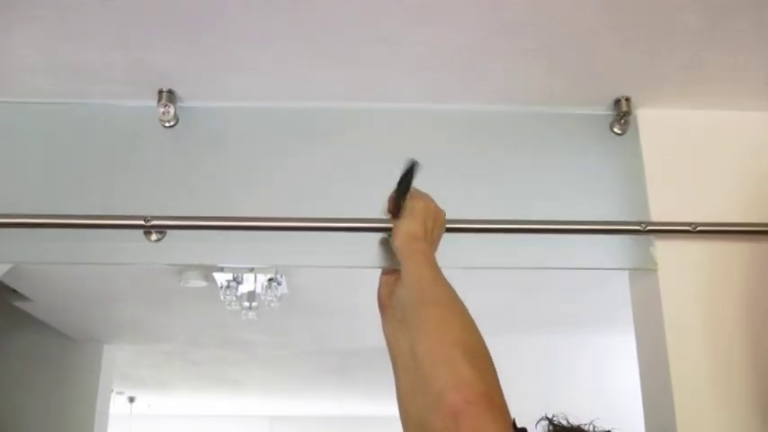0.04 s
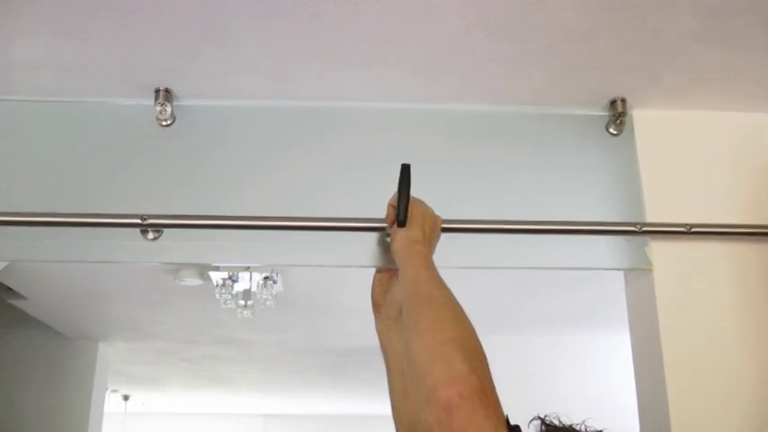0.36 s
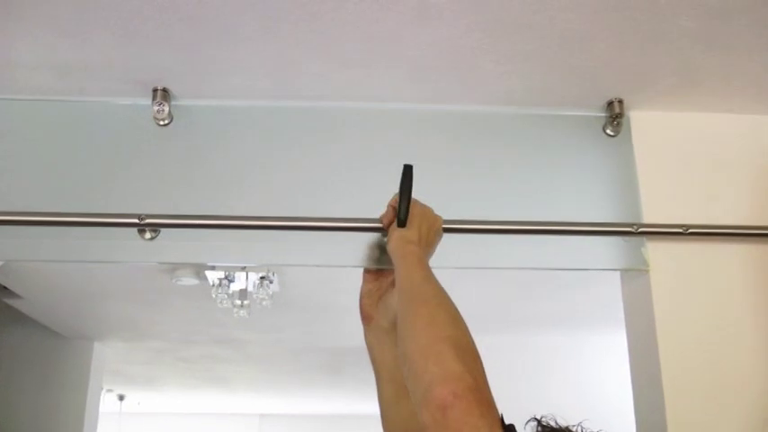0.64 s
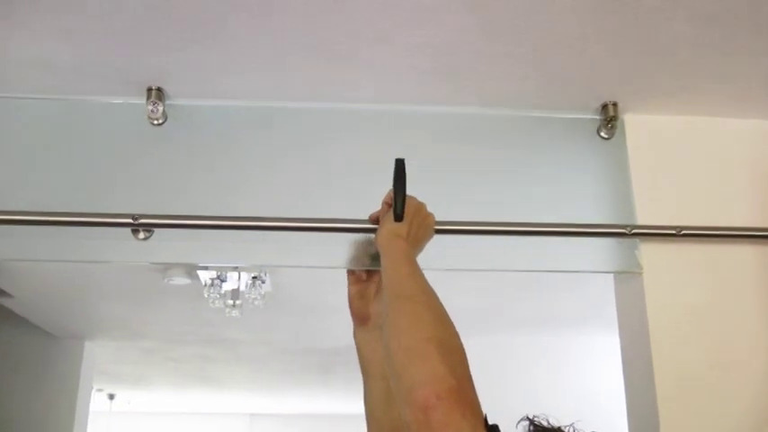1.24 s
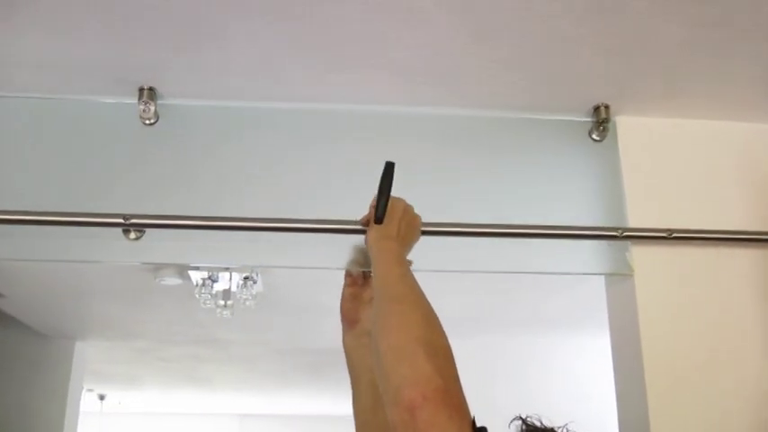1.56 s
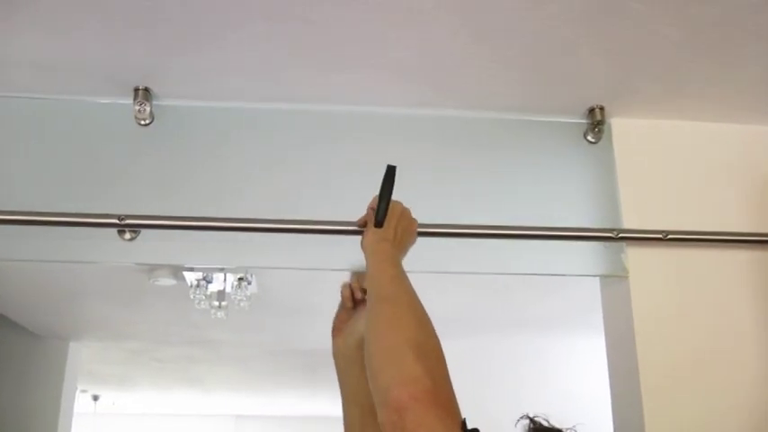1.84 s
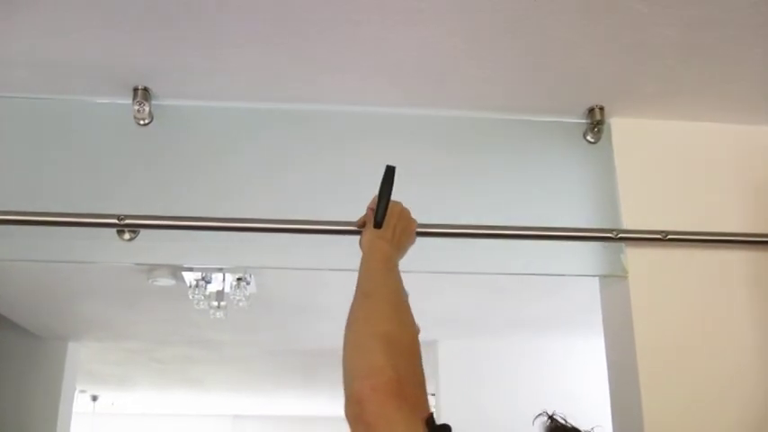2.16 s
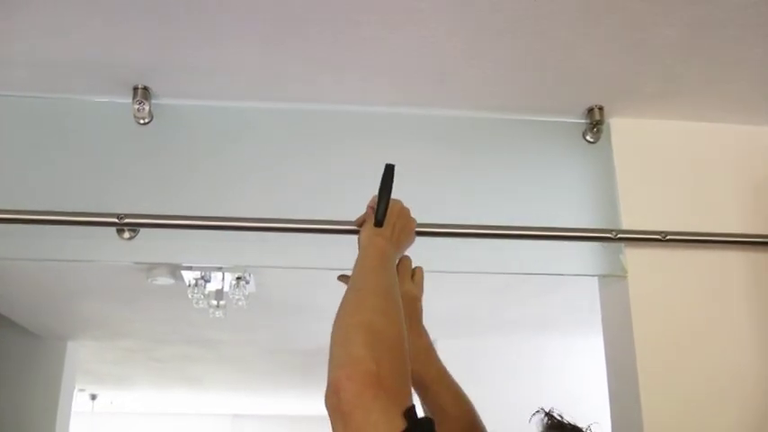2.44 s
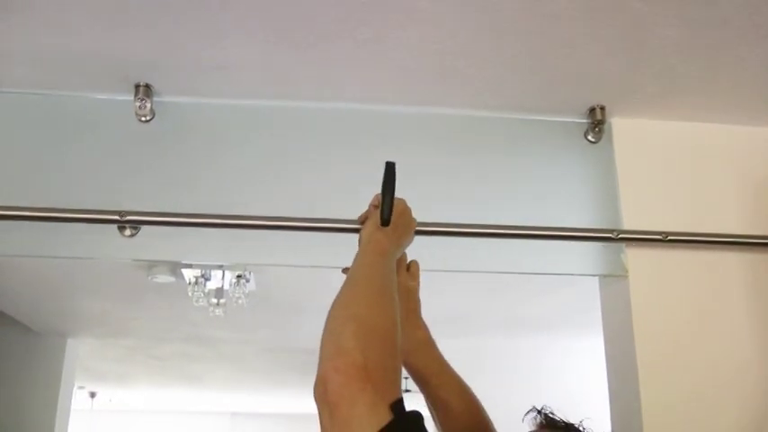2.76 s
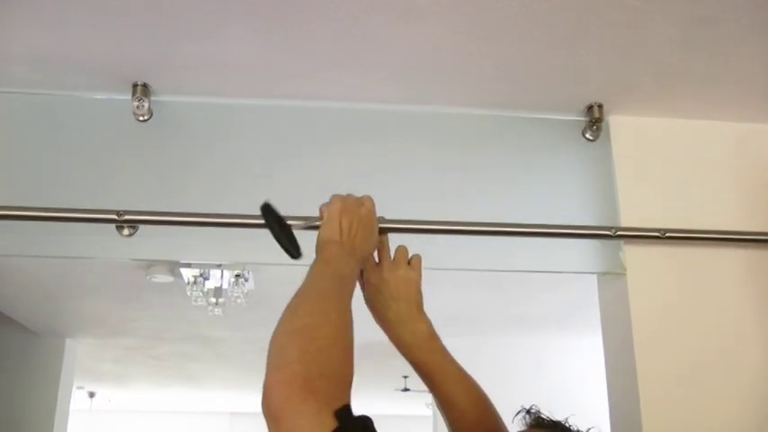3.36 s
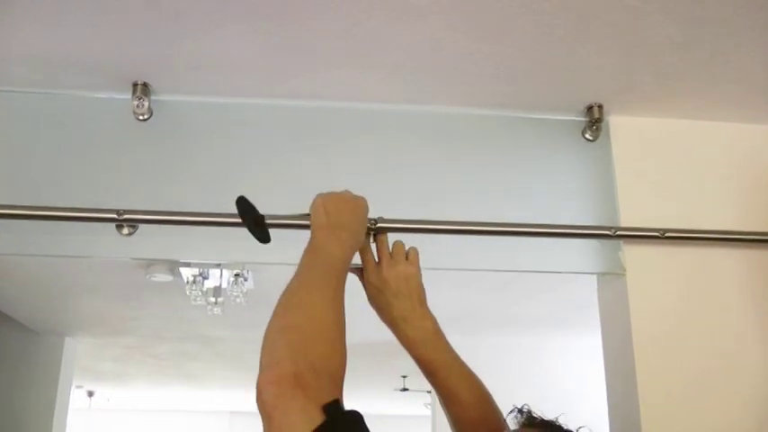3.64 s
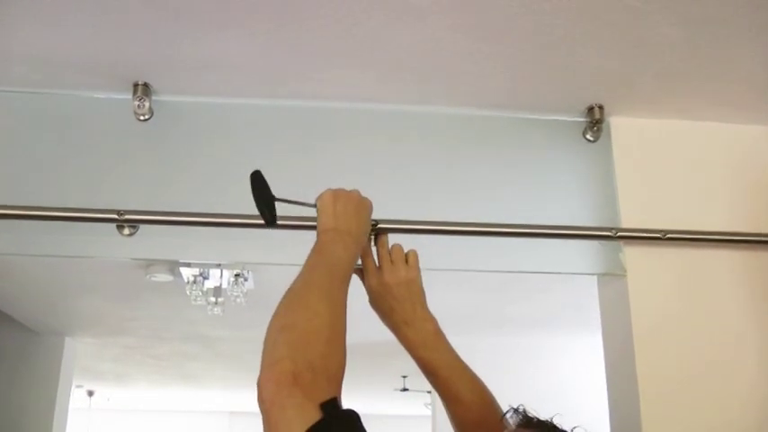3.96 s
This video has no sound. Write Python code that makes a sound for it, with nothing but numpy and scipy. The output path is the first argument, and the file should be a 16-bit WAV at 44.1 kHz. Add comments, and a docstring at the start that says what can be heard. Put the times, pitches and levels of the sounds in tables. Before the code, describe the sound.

A hand tool screws a metal fitting tight, with short grating turns and small clicks.

```python
"""Screwing a fitting onto a glass door.

A T-handled key drives a steel fitting onto the door's rail in a bare, quietly humming room.
The thread sticks and slips in two short, grating turns that ring the fitting and the rail.
The key clicks in its socket and sets a small cap ringing. The glass thuds softly; hands rub on metal."""
import sys
import numpy as np
from scipy import signal
from scipy.fft import rfft, irfft
from scipy.io import wavfile
from scipy.ndimage import uniform_filter1d

SR = 44100
rng = np.random.default_rng(int(sys.argv[2]) if len(sys.argv) > 2 else 0)


def store_wav(level_fs):
    """Save 16-bit WAV to argv[1]."""
    pcm = np.round(np.clip(np.atleast_2d(level_fs), -1, 1) * 32767)
    wavfile.write(sys.argv[1], SR, pcm.T.astype(np.int16))


N = 176400
TIME_S = np.arange(N) / SR

# room noise: freq_hz, relative_db
AIR_SPECTRUM = [(20, -20), (53, -11), (86, -14), (120, -6), (300, -12.5), (380, -13.5), (520, -14.5),
                (800, -20), (1100, -21), (1300, -24), (1700, -14.5), (3000, -19.5), (4110, -18),
                (8000, -27), (11500, -30), (13000, -75.5)]
# faint drones in the room noise: freq_hz, width_hz, gain_db
AIR_MODES = [(289.4, 107.3, -0.5), (777.5, 38.4, 14), (994.1, 8.3, 15.5)]
# low drone: time_s, level_db
RUMBLE_ENVELOPE = [(0, -64), (0.7, -76.5), (1.1, -66), (1.6, -66), (2.6, -68.5), (3.1, -74), (4, -69)]
# reverberation time: freq_hz, t60_s
ROOM_T60 = [(200, 0.85), (400, 0.58), (1000, 0.56), (2200, 0.63), (4500, 0.3553), (8000, 0.3946),
            (13000, 0.01)]
# reverberation level: freq_hz, level_db
ROOM_LEVEL = [(200, -1), (1000, -1.5), (2200, 0.5), (4500, -1.5), (8000, -10.5), (13000, 2.5)]

# hands on metal: time_s, level_db
RUB_ENVELOPE = [(0, -65), (0.6, -60.5), (0.78, -57), (1.2, -57), (1.45, -58.5), (1.9, -64.5), (2.7, -77),
                (3.3, -55.5), (3.85, -57), (4, -52.5)]
# knocks on the glass: start_s, level_db, pitch_hz, decay_s, note_gain_db
THUDS = [(0.0, -45.5, 548, 0.00817, 7), (0.124, -55, 336, 0.0284, 9), (0.232, -49, 331.8, 0.0304, 6.5),
         (1.215, -47.5, 329.8, 0.0199, 6), (1.284, -43.5, 289.8, 0.02, -7),
         (1.535, -48.5, 335.8, 0.051, -4.5), (2.766, -45.5, 207, 0.00634, 4.5),
         (3.372, -46, 324.8, 0.0221, 4.5), (3.607, -55.5, 284.6, 0.0211, 7.5),
         (3.923, -43.5, 312.3, 0.0258, -5)]
# turns of the thread: time_s, level_db
FIRST_TURN_ENVELOPE = [(0, -49.5), (0.045, -55), (0.08, -64), (0.135, -58.5), (0.168, -41.5), (0.21, -40),
                       (0.25, -42), (0.275, -51.5), (0.33, -57), (0.38, -52.5), (0.42, -89)]
LAST_TURN_ENVELOPE = [(2.78, -62), (2.812, -53), (2.832, -45), (2.87, -42.5), (2.92, -45), (2.965, -36.5),
                      (2.985, -30), (3.012, -35.5), (3.035, -42.5), (3.055, -39), (3.09, -48.5),
                      (3.135, -43), (3.17, -67.5)]
# key in its socket: start_s, level_db, decay_s, upper_edge_hz, lower_edge_hz, cap_drive_db
CLICKS = [(0.346, -41.5, 0.0039, 8100, 700, 11), (0.484, -48, 0.00585, 8500, 1500, 2),
          (0.907, -36, 0.0135, 6050, 986, 1), (0.919, -39.5, 0.0096, 5500, 980, 10.5),
          (1.082, -32, 0.0106, 6330, 2280, -30.5), (1.236, -45.5, 0.04, 3470, 1210, -7.5),
          (1.255, -35.5, 0.0096, 9720, 1490, -21), (1.281, -32, 0.00632, 3900, 249, -3),
          (1.481, -43, 0.0053, 6940, 1200, -17.5), (1.4891, -29, 0.00395, 7440, 1340, -0.5),
          (1.526, -25.5, 0.00362, 11400, 1960, -35), (1.529, -24.5, 0.006, 3056, 1126, -29),
          (1.9162, -37, 0.00227, 4940, 3800, -25.5), (1.925, -46, 0.0043, 2170, 298, -20),
          (2.2395, -37.5, 0.00151, 4170, 2740, -25), (2.457, -50.5, 0.026, 3500, 1200, -4.5),
          (2.643, -51.5, 0.0354, 3010, 1200, -4), (2.765, -26, 0.00107, 4030, 3860, -16.5),
          (2.828, -32.5, 0.0063, 3500, 1300, -12), (2.838, -31.5, 0.0047, 6300, 785, -19.5),
          (2.859, -46, 0.0043, 8000, 890, -21), (2.889, -26.5, 0.0027, 9400, 1480, -24.5),
          (2.932, -35.5, 0.0034, 8000, 1200, -19.5), (2.942, -34, 0.003, 9000, 2500, -20.5),
          (2.9588, -23.5, 0.00475, 10950, 4030, -29), (2.972, -27, 0.0121, 10350, 3500, -6),
          (3.088, -23, 0.00344, 12600, 2330, -1), (3.1108, -20, 0.00408, 13100, 3590, -6.5),
          (3.9198, -37, 0.0047, 6080, 300, -10.5), (3.923, -28.5, 0.0061, 1610, 1540, -30),
          (3.9375, -33.5, 0.00495, 9260, 2860, -11.5)]

# contact spectra: freq_hz, relative_db
RUB_SPECTRUM = [(100, -24), (200, -14), (265, 11.5), (400, -1.5), (600, 4.5), (800, -3), (1200, -1),
                (2200, 6), (4000, 1.5), (6600, -2.5), (12000, -13.5), (14000, -69.5)]
THUD_SPECTRUM = [(60, -21.5), (160, -4), (350, 2), (550, -8.5), (1000, -16.5), (1600, -7), (4000, -46.5)]
FIRST_TURN_SPECTRUM = [(100, -29.5), (200, -30.5), (320, 1), (450, -10), (720, 0), (1050, -3), (1750, -1),
                       (2300, -2), (3200, -5), (5400, -9), (8000, -20), (12000, -39)]
LAST_TURN_SPECTRUM = [(100, -23.5), (200, -10), (320, -1.5), (430, -11), (560, -6.5), (1000, -10),
                      (1400, -0.5), (2000, 1), (3200, 3), (5000, -1.5), (7600, -4.5), (10000, -16),
                      (14000, -28.5)]
CLICK_SPECTRUM = [(100, -41), (300, -8), (700, -5), (1050, -13), (1700, 2.5), (2700, 1), (4000, -2.5),
                  (6000, -0.5), (8500, -4.5), (11000, -13.5), (14000, -21.5)]

# resonances of the metal parts: freq_hz, width_hz, gain_db
RAIL_MODES = [(270, 28.4, 0), (329.2, 32, 3), (556.1, 29, 7.5), (712, 27.6, 6), (1722.2, 46.8, 6),
              (1834, 45, 0), (2457.2, 37.8, 1.5), (2706.5, 52.3, 0), (8277, 150, 1.5)]
FITTING_MODES = [(1399, 41.8, 6.5), (2009.5, 30.8, 7.5), (3408, 28, 3), (3571, 21.3, 6), (4355, 10.9, 2.5),
                 (4710, 28.4, 4.5), (5428, 36, 6.5), (6928, 38, 2)]
CAP_MODES = [(3030.3, 47.3, 13), (5260, 79, 0.5), (7155, 106, 3.5)]


def from_db(db):
    """Decibels to gain."""
    return 10 ** (np.asarray(db) / 20)


def unit_rms(x):
    """Scale to unit power."""
    return x / np.sqrt(np.mean(x ** 2) + 1e-20)


def at_hz(table, hz):
    """Interpolate on a log-frequency axis."""
    freqs_hz, values = np.transpose(table)
    return np.interp(np.log(np.maximum(hz, 1)), np.log(freqs_hz), values)


def gain_curve(envelope):
    """Gain over time, zero outside the envelope's span."""
    times_s, levels_db = np.transpose(envelope)
    active = (TIME_S >= times_s[0]) & (TIME_S <= times_s[-1])
    return from_db(np.interp(TIME_S, times_s, levels_db)) * active


def colour(x, spectrum, taps=4096):
    """Minimum-phase filter with the given spectrum and unit power gain."""
    gain = unit_rms(from_db(at_hz(spectrum, np.fft.rfftfreq(taps, 1 / SR))))
    cepstrum = irfft(np.log(gain))
    cepstrum[1:taps // 2] *= 2
    cepstrum[taps // 2 + 1:] = 0
    response = irfft(np.exp(rfft(cepstrum)))
    return signal.fftconvolve(x, response)[:len(x)]


def low_pass(x, hz, order=2):
    """Soften the treble."""
    return signal.sosfilt(signal.butter(order, hz, fs=SR, output="sos"), x)


def high_pass(x, hz):
    """Thin the bass."""
    return signal.sosfilt(signal.butter(2, hz, "high", fs=SR, output="sos"), x)


def resonate(x, modes):
    """Parallel two-pole resonances driven by x."""
    ringing = 0
    for freq_hz, width_hz, gain_db in modes:
        radius = np.exp(-np.pi * width_hz / SR)
        feedback = [1, -2 * radius * np.cos(2 * np.pi * freq_hz / SR), radius ** 2]
        mode = (1 - radius ** 2) / 2 * signal.lfilter([1, 0, -1], feedback, x + 1e-18)
        ringing += from_db(gain_db) * mode
    return ringing


def strike(start_s, attack_s, decay_s):
    """Envelope of a blow: quick rise, exponential fall."""
    age_s = np.maximum(TIME_S - start_s, 0)
    return (1 - np.exp(-age_s / attack_s)) * np.exp(-np.minimum(age_s / decay_s, 40))


def stereo(mid, side, side_db=0):
    """Mid and side to left and right."""
    side = from_db(side_db) * side
    return np.array([mid + side, mid - side])


def room_air(level_db=-62.5):
    """Steady room noise with faint narrow drones."""
    air = from_db(level_db) * colour(rng.standard_normal(N), AIR_SPECTRUM)
    return air + resonate(air, AIR_MODES)


def room_rumble(pitch_hz=88.34, width_hz=17.6):
    """Low, wavering drone of narrow-band noise."""
    mode = [(pitch_hz, width_hz, 0)]
    drone = resonate(resonate(rng.standard_normal(N), mode), mode)
    return gain_curve(RUMBLE_ENVELOPE) * unit_rms(drone)


def even_reflections(age_s, passes=6):
    """Random reflections, evened out so that no pitch stands out of their decay."""
    fade = from_db(-60 * age_s / at_hz(ROOM_T60, 2000))
    noise = rng.standard_normal(len(age_s))
    for _ in range(passes):
        whitened = irfft(np.exp(1j * np.angle(rfft(noise * fade))))
        local_power = np.abs(uniform_filter1d(whitened ** 2, size=400))
        noise = whitened / np.sqrt(local_power + 1e-20)
    return noise


def room_tail(x, bands=12, delay_s=0.005):
    """Diffuse reverberation of hard walls, dying faster in the treble."""
    age_s = TIME_S[:SR]
    reflection_spectrum = rfft(even_reflections(age_s)) / np.sqrt(SR)
    bins_hz = np.arange(SR // 2 + 1)
    centres_hz = np.geomspace(100, 14000, bands)
    response = 0
    for centre_hz, weights in zip(centres_hz, np.eye(bands)):
        band = irfft(reflection_spectrum * np.interp(bins_hz, centres_hz, weights))
        fade = from_db(-60 * age_s / at_hz(ROOM_T60, centre_hz))
        response += from_db(at_hz(ROOM_LEVEL, centre_hz)) * unit_rms(fade) * band
    delayed = np.pad(x, (int(delay_s * SR), 0))
    return signal.fftconvolve(delayed, response)[:N]


def bare_room(direct, echo_delay_s=0.0017, echo_db=-13, side_tail_db=-10):
    """Direct sound ahead, widened by a ceiling echo and reverberation."""
    ceiling_echo = from_db(echo_db) * np.interp(TIME_S - echo_delay_s, TIME_S, direct, left=0)
    mid = direct + room_tail(direct)
    side = ceiling_echo + from_db(side_tail_db) * room_tail(direct)
    return stereo(mid, side)


def hand_rub():
    """Faint friction noise of hands on metal."""
    return gain_curve(RUB_ENVELOPE) * colour(rng.standard_normal(N), RUB_SPECTRUM)


def glass_thuds(attack_s=0.00273):
    """Soft knocks: a dull rattle of the panel around a short, low note."""
    rattle = colour(rng.standard_normal(N), THUD_SPECTRUM)
    thuds = 0
    for start_s, level_db, pitch_hz, decay_s, note_gain_db in THUDS:
        note = from_db(note_gain_db) * np.sin(2 * np.pi * pitch_hz * (TIME_S - start_s))
        thuds += from_db(level_db) * strike(start_s, attack_s, decay_s) * (note + rattle)
    return thuds


def thread_scrape(envelope, spectrum, slips_per_s=3200, spread_db=2.5, judder_db=3, judder_cut_hz=112.6):
    """The thread sticks and slips in dense, juddering runs of tiny clicks."""
    sizes = from_db(spread_db * np.minimum(rng.exponential(1, N), 4))
    signs = rng.choice([-1, 1], N)
    slips = sizes * signs * (rng.random(N) < slips_per_s / SR)
    judder = unit_rms(low_pass(rng.standard_normal(N), judder_cut_hz))
    grating = unit_rms(slips * from_db(judder_db * judder))
    return colour(grating * gain_curve(envelope), spectrum)


def key_clicks(attack_ratio=0.1052):
    """Brief bursts of steel chattering on steel; some ring the cap."""
    contact, cap_drive = 0, 0
    for start_s, level_db, decay_s, upper_edge_hz, lower_edge_hz, cap_drive_db in CLICKS:
        chatter = rng.choice([-1., 1.], N) * strike(start_s, attack_ratio * decay_s, decay_s)
        burst = from_db(level_db) * high_pass(low_pass(chatter, upper_edge_hz, order=4), lower_edge_hz)
        contact += burst
        cap_drive += from_db(cap_drive_db) * burst
    return colour(contact + resonate(cap_drive, CAP_MODES), CLICK_SPECTRUM)


def scene(first_turn_cap_db=-3.5, pan_db=0.5):
    """Thread and key ring the metal parts, slightly left of centre, over the room's hum."""
    first_turn = thread_scrape(FIRST_TURN_ENVELOPE, FIRST_TURN_SPECTRUM)
    last_turn = thread_scrape(LAST_TURN_ENVELOPE, LAST_TURN_SPECTRUM)
    thread = first_turn + last_turn
    steel = key_clicks() + thread
    rail = resonate(steel, RAIL_MODES)
    fitting = resonate(thread, FITTING_MODES)
    cap = from_db(first_turn_cap_db) * resonate(first_turn, CAP_MODES)
    work = bare_room(steel + rail + fitting + cap + glass_thuds())
    background = stereo(room_air() + hand_rub(), room_air() + hand_rub(), side_db=-11)
    rumble = stereo(room_rumble(), room_rumble(), side_db=-10)
    return work * from_db([[pan_db], [-pan_db]]) + background + rumble


def record(dry):
    """Steep treble cut."""
    cutoff_hz = 13900
    return signal.sosfilt(signal.ellip(10, .3, 80, cutoff_hz, fs=SR, output="sos"), dry)


dry = scene()
out = record(dry)
store_wav(out)
```